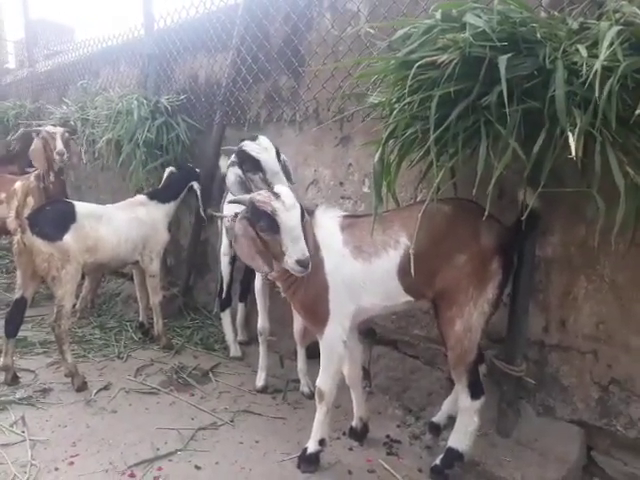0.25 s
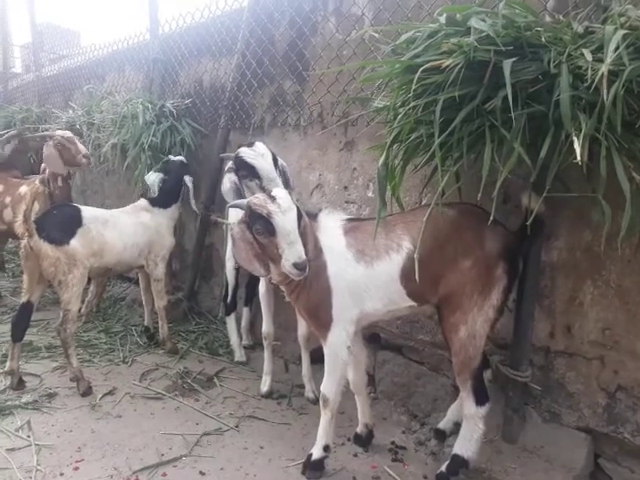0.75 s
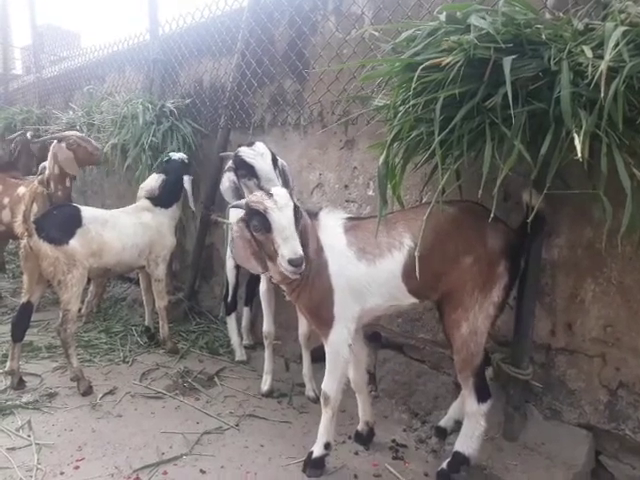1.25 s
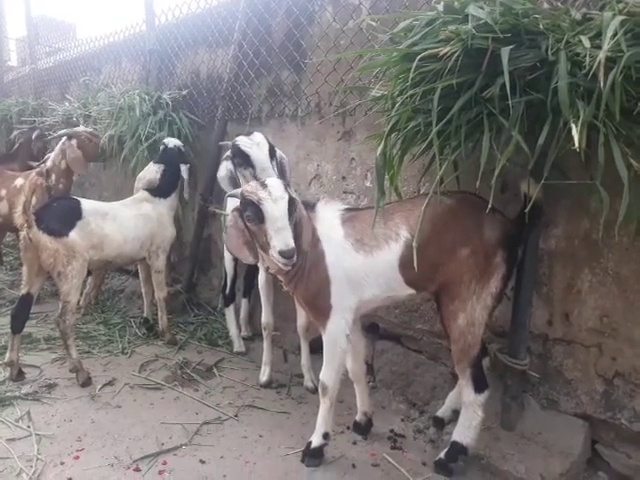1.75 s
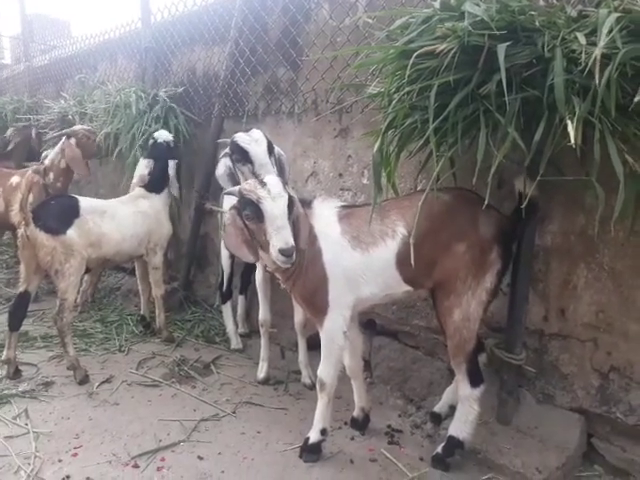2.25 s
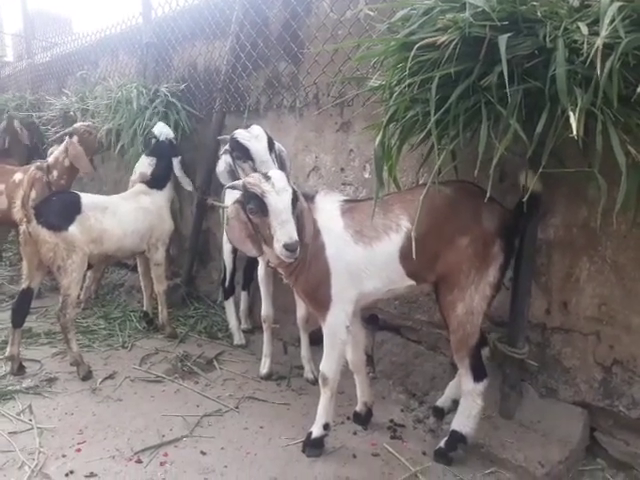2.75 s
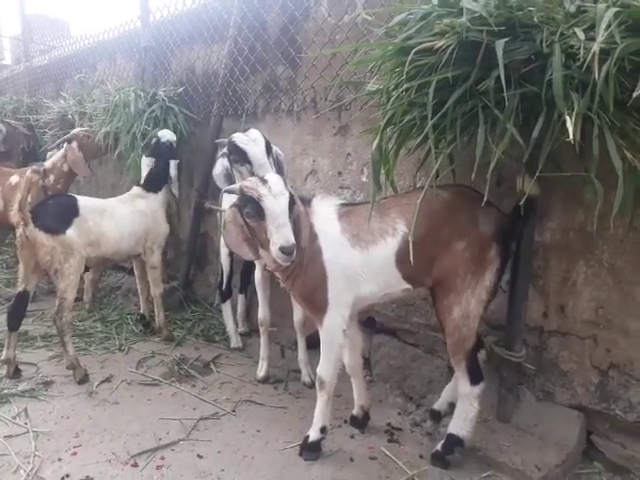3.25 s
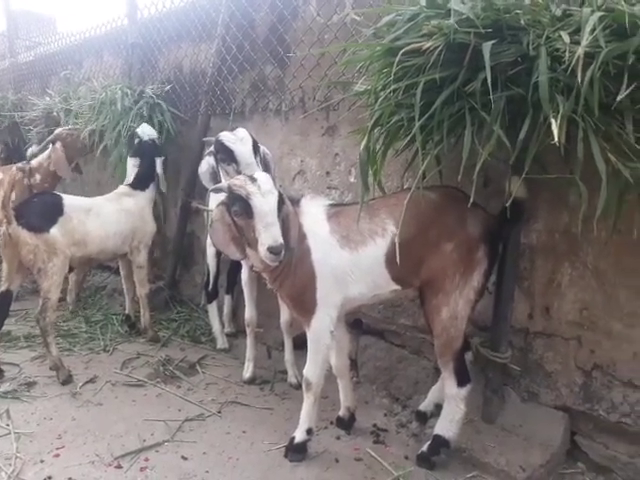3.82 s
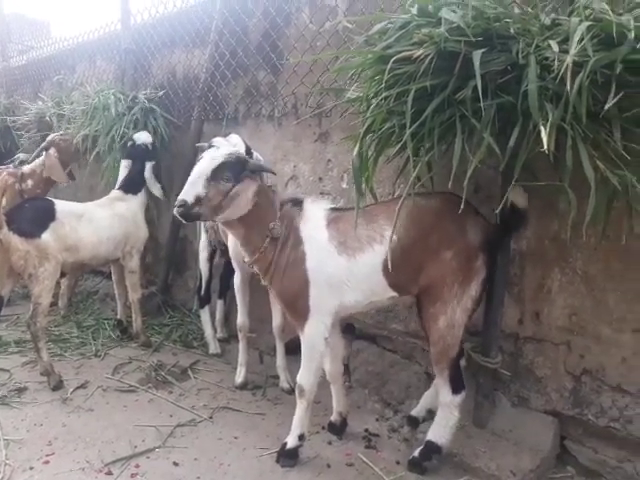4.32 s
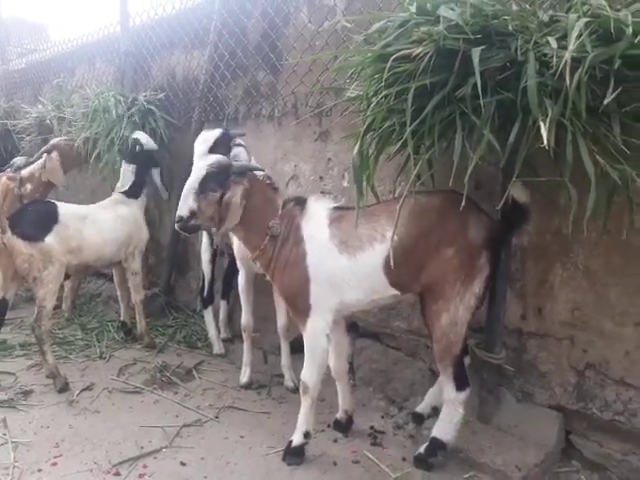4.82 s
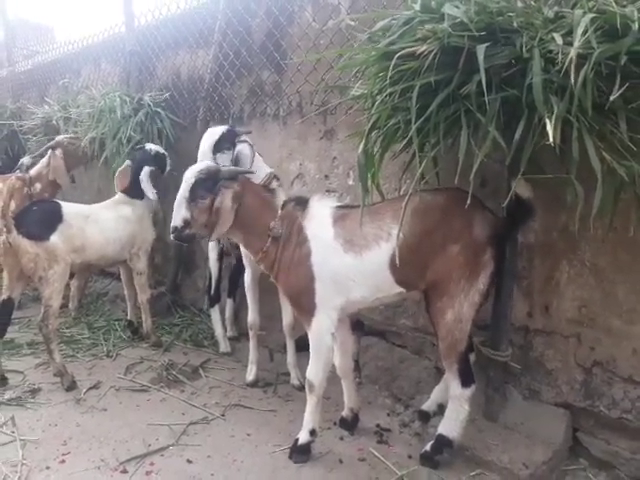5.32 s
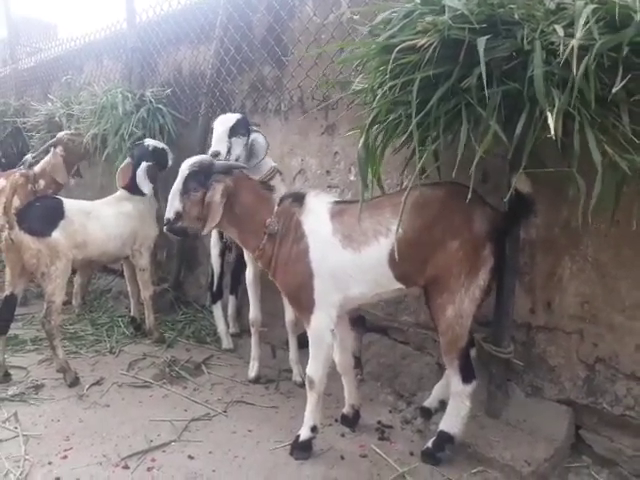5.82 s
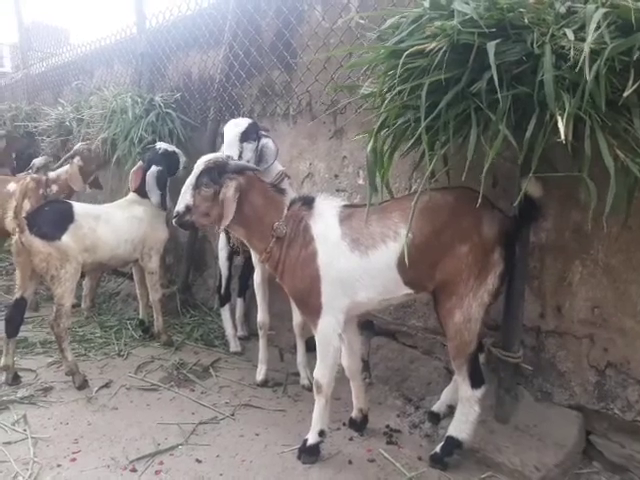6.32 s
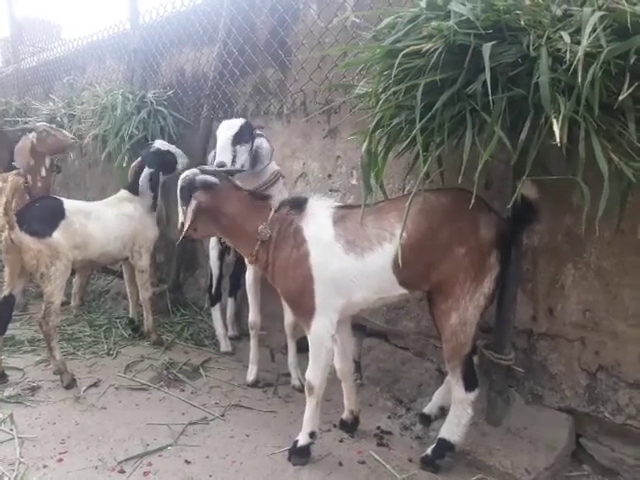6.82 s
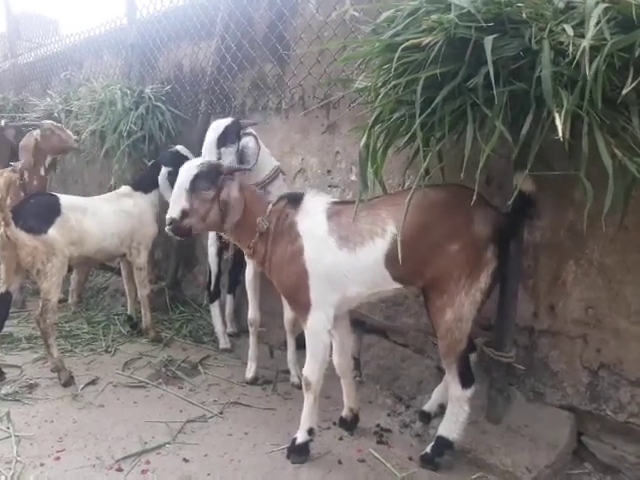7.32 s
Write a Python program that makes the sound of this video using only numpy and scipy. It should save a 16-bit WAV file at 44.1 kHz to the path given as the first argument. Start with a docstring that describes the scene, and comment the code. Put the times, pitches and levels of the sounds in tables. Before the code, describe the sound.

A walled outdoor pen with low rumble and airy hiss, picked up by a simple nearby microphone. From 0 to 0.8 s a young goat bleats at some distance, thin and trembling, around 300 Hz, with raspy bird chirps at the start and near 0.5 s. From 0.95 to 1.75 s a near goat bleats very loudly, buzzy and nasal, throbbing about ten times a second as its mouth opens. The background then sinks, almost hushed from 1.9 to 2.9 s, with faint rustles and tiny ticks. From 3 to 5.4 s grass swishes in short grainy swells, stalks snap crisply, notably at 3.5 and 4.7 s, and a bird chirps at 5.4 s. Light taps and snaps continue to 6.5 s. Heavy, low, rattling knocks strike at 6.65, 7.1 and 7.45 s, while a rougher, quieter bleat runs from 6.95 s to the end, strongest around 7.35 s, as the hiss rises.

```python
"""A walled pen outdoors with young goats: one bleats further off, then one bleats loudly and again near the
end. In between, grass rustles in grainy swells of noise, stalks snap in short bursts, and small birds chirp.
Low rumble and hiss lie under it all; after the loud bleat the background sinks into a hush of about a second.
Three heavy knocks near the end ring low and rattle. A bleat is a buzz of throat pulses shaped by the mouth."""
import sys
import numpy as np
from scipy import signal
from scipy.fft import rfft, irfft, next_fast_len
from scipy.io import wavfile
from scipy.ndimage import uniform_filter1d, minimum_filter1d

SR = 44100
rng = np.random.default_rng(int(sys.argv[2]) if len(sys.argv) > 2 else 0)


def persist_wave(psi):
    """Save psi, clipped to +-1, as 16-bit WAV."""
    counts = np.round(np.clip(psi, -1, 1) * 32767).astype(np.int16)
    wavfile.write(sys.argv[1], SR, np.atleast_2d(counts).T)


N = 333341
TIME = np.arange(N) / SR

# Levels of the background noise, which sinks for about a second after the loud bleat and then returns:
# t/s, rumble level/dB, hiss level/dB, fizz level/dB
BACKGROUND_LEVELS = [(0, -41, -36.5, -73), (.85, -41, -40, -55), (1.3, -41, -35, -69),
                     (1.899, -54.5, -49.5, -80), (2.298, -57.5, -56, -65), (2.7, -58.5, -60, -64.5),
                     (2.95, -48, -48, -63), (3.3, -43.5, -40.5, -54), (4.0, -43, -42, -56),
                     (4.4, -43, -45, -50), (4.65, -42.5, -38.5, -38.5), (5.05, -44, -39.5, -35.5),
                     (5.6, -42.5, -35.5, -34), (6.4, -43.5, -38.5, -35), (7.0, -41, -34.5, -39.5),
                     (7.56, -42, -27, -42)]
# Colour of the rumble, hiss and fizz: f/Hz, relative level/dB
RUMBLE_COLOUR = [(15, -63.5), (25, -6), (76, -14.5), (97, -5), (123, 0.5), (252, -10), (331, -9),
                 (452, -13), (498, -12), (654, -14), (707, -12.5), (795, -14), (2060, -23), (2600, -18.5),
                 (3380, -16.5), (5720, -120)]
HISS_COLOUR = [(1000, -24.5), (2400, -12.5), (3200, -5), (3900, 3), (5000, -1.5), (6200, -7), (7900, -1),
               (8700, -10), (9500, -17), (16000, -19)]
FIZZ_COLOUR = [(700, -11), (1300, -2.5), (2200, -19.5), (6000, 1.5), (8000, 12.5), (9500, -5), (12500, -1),
               (15200, 1.5), (16000, -18)]
# Faint thin tones in the yard: t/s, length/s, level/dB, f/Hz
YARD_TONES = [(0, 0.39, -42.5, 452), (0, .2, -49, 690), (1.8, 0.18, -60.5, 1370), (3.38, 0.39, -49.5, 3190),
              (4.01, 0.27, -47.5, 3180), (4.862, 0.45, -59, 1325)]
# How long the pen's echoes take to fade by 60 dB: f/Hz, fade time/s
PEN_FADE = [(200, 0.42), (1500, 0.21), (4000, 0.38), (8000, 0.17), (15000, 0.074)]
# First echoes off the wall and the floor: delay/s, level/dB
FIRST_ECHOES = [(.0047, -17), (.0083, -19.5)]
# Bird chirps and squeaks: t/s, length/s, level/dB, start f/Hz, middle f/Hz, end f/Hz, rasp/0-1
BIRD_CHIRPS = [(0.065, 0.068, -31.5, 3700, 3820, 3730, 0.62), (0.479, 0.083, -23.5, 4440, 4303, 3660, 0.62),
               (2.642, 0.031, -50, 4800, 5280, 3500, .05), (4.054, 0.031, -38, 4770, 5210, 3500, 0.1),
               (5.112, 0.034, -42, 3200, 3330, 3340, .3), (5.416, .16, -24.5, 3610, 4174, 3654, 0.83),
               (5.916, 0.042, -32, 1260, 1356, 2210, 0.23)]
# Snapping stalks and hoof taps, and one short bird chirp at 6.398 s: t/s, level/dB, centre f/Hz, width/octaves,
# decay/s
STALK_SNAPS = [(2.749, -44, 7950, 0.13, 0.0044), (2.784, -42, 7500, 0.37, 0.0059),
               (2.887, -41.5, 7000, 0.093, 0.0092), (3.125, -34, 13000, 0.44, .035),
               (3.385, -31, 6900, 0.7, 0.0019), (3.487, -22.5, 7800, 0.17, 0.0053),
               (4.177, -34, 7500, 0.19, .003), (4.27, -36, 7450, 0.17, .003),
               (4.697, -20.5, 4530, 1, 0.0045), (4.721, -24, 4500, 0.99, .003),
               (4.74, -21.5, 4200, 0.36, 0.0043), (4.743, -35.5, 1260, 0.53, 0.022),
               (5.384, -37.5, 1300, 0.38, 0.017), (5.475, -41, 1300, .3, .02),
               (5.928, -25, 4430, 0.89, 0.04), (6.078, -24, 1440, 1, 0.0057),
               (6.398, -27, 5540, .15, 0.0046), (6.464, -30, 1900, 1, 0.0057)]
# Swishes of grass: t/s, level/dB, rise/s, decay/s, treble tilt/(dB per octave)
GRASS_SWISHES = [(1.841, -37, 0.037, 0.037, -7.5), (1.99, -37.5, 0.046, 0.047, -10),
                 (2.14, -37.5, 0.018, 0.05, -8.5), (2.954, -31, 0.026, 0.057, -5.5),
                 (3.135, -25, 0.037, .055, -8.5), (3.705, -23.5, 0.026, 0.058, -4.5),
                 (3.845, -24, 0.038, 0.053, -4), (4.8, -25, 0.039, 0.047, -5),
                 (5.33, -26, 0.039, 0.063, -5.5)]
# Colour of the sliding grass: f/Hz, relative level/dB
GRASS_COLOUR = [(1060, -48), (1800, -30.5), (2750, -22), (3120, -12), (4090, 0), (5400, -3.5), (6070, 0),
                (6590, -1.5), (7140, 5), (7470, 4.5), (9790, -19.5), (12700, -25), (15500, -39)]
# Knocks, heavy and faint: t/s, level/dB, treble tilt/(dB per octave)
KNOCK_EVENTS = [(.004, -35.5, -6), (1.925, -43.5, 1.5), (1.975, -48.5, -1), (6.643, -5.5, 0.5),
                (7.088, -7, -1), (7.452, -8.5, -2.5)]
# Low ringing modes of a knock: f/Hz, relative level/dB, time to fade 60 dB/s (capped when used)
KNOCK_LOW_MODES = [(66.5, -10, 0.5), (133.3, -0.5, 0.51), (203, -1, 0.5), (301.5, 0, 0.35),
                   (352, 7.5, 0.19), (445, -10, 0.78), (670, -24, 0.37), (735, -16, 0.1)]
# Colour of the rattling body of a knock: f/Hz, relative level/dB
KNOCK_BODY_COLOUR = [(21, -43), (35, -21), (151, 2), (333, 2.5), (568, -6), (700, -5.5), (883, -13),
                     (1470, -15.5), (1610, -18), (2450, -26), (3720, -25.5), (6060, -36.5), (8010, -28),
                     (9000, -40), (11700, -52), (19800, -120)]
# How long that body takes to fade by 60 dB: f/Hz, fade time/s
KNOCK_BODY_FADE = [(60, 0.38), (200, 0.41), (500, 0.39), (1500, 0.45), (6000, 0.55)]

# Throbs of each bleat, one row a throb: t/s, level/dB, length/s, pitch f/Hz, roughness/0-1,
# mouth (place along the bleat's list of mouth shapes, from 0), level in the lull after it/dB
FAR_THROBS = [(.01, -29.5, 0.016, 289.6, 0.71, 0, -73), (.1, -52, 0.06, 285.7, 0.46, 0, -59),
              (.187, -33, 0.032, 298.8, 0.38, 0, -48), (.28, -26.5, 0.035, 308.4, 0.61, 0, -44),
              (.378, -25.5, 0.043, 302.4, 0.48, 0, -36), (.468, -25.5, 0.048, 302.4, 0.24, 0, -48),
              (.56, -27.5, 0.027, 298, 0.52, 0, -35), (.655, -31, 0.044, 291, 0.33, 0, -43),
              (.75, -41, 0.047, 290, 0.34, 0, -43)]
LOUD_THROBS = [(.93, -29, 0.029, 275.2, 0.3, 0, -39), (1.02, -10.5, 0.035, 277.4, 0.66, 0.41, -22.5),
               (1.1, -11.5, 0.024, 300.1, 0.63, 0.46, -21), (1.128, -3, 0.016, 316.7, 0.4, 0.53, -30),
               (1.197, 1.5, 0.049, 311, 0.63, 0.71, -47), (1.28, -1.5, 0.046, 301.4, 0.24, 0.87, -13),
               (1.38, 3.5, 0.04, 313.1, 0.57, 1.66, -17.5), (1.465, 2.5, 0.055, 322, 0.54, 1.93, -15),
               (1.567, -1, 0.053, 332, 0.5, 1.87, -16), (1.666, -4.5, 0.042, 312.8, 0.58, 1.8, -24),
               (1.725, -20.5, 0.041, 310, 0.1, 1.78, -40), (1.77, -44.5, .025, 279, 0.1, 1.1, -50)]
LAST_THROBS = [(6.95, -27, 0.036, 272.8, 0.67, 0.41, -38), (7.053, -20, 0.038, 292.7, 0.53, 0.17, -38),
               (7.155, -18, 0.038, 305.8, 0.43, 0.35, -40), (7.245, -18.5, 0.035, 314.6, 0.52, 0.2, -32),
               (7.339, -7.5, 0.037, 319.2, 0.59, 2.4, -25.5), (7.437, -12.5, 0.041, 303, 0.14, 1.76, -46),
               (7.538, -21.5, 0.029, 295, 0.31, 0.35, -39)]
# Throat and mouth resonances for each mouth shape: f/Hz, width/Hz, relative level/dB
MOUTH_TURNED_AWAY = [(917, 140, -13.5), (2020, 200, -12), (3300, 340, -1.5), (3950, 480, -3.5),
                     (4426, 170, 5), (5250, 600, -5.5), (6670, 1040, -7.5), (7900, 410, -6.5)]
MOUTH_PARTED = [(299, 280, -22.5), (1193, 230, -9.5), (2190, 180, -10), (3260, 890, -12.5),
                (3640, 350, 0.5), (4550, 560, -8), (5460, 280, -9), (8160, 440, -15)]
MOUTH_OPEN = [(395, 280, -14.5), (1432, 237, -10), (2152, 264, -2.5), (3282, 310, 5.5), (3700, 400, -25.5),
              (4125, 296, 0.5), (5050, 700, -13.5), (8450, 580, -25.5)]
MOUTH_WIDE = [(547, 220, -19.5), (1160, 256, -18), (2176, 130, -1), (3130, 455, 1), (3814, 360, 11),
              (4750, 450, -0.5), (5600, 230, -4.5), (6680, 200, -5), (7600, 1800, -18.5)]
MOUTH_SLACK = [(453, 300, -11), (1186, 280, 0), (2175, 285, 3.5), (3210, 510, 4), (4200, 270, 1),
               (5100, 520, -7), (8270, 1030, -7.5), (11000, 640, -16.5), (15200, 500, -16)]  # a relaxed mouth
MOUTH_TENSE = [(300, 240, -28.5), (1280, 410, -26), (2160, 220, -18.5), (2920, 290, -18), (3960, 270, -2.5),
               (4920, 450, -8.5), (6530, 210, -11), (8060, 1160, -16.5)]
# Voice left between the resonances: f/Hz, relative level/dB
BUZZ_FLOOR = [(200, -50), (800, -50), (6000, -30.5), (9000, -35), (9700, -46), (10400, -31), (11500, -31.5),
              (12200, -45), (13000, -31.5), (14100, -50), (15100, -31), (15800, -51.5)]
# Colour of the low flutter of air in the throat: f/Hz, relative level/dB
FLUTTER_COLOUR = [(60, -32), (170, -14), (300, 0), (480, -3), (700, -10.5), (1000, -11), (3000, -59)]


def amp(db):
    """Turns decibels into a gain."""
    return 10 ** (np.asarray(db) / 20)


def unit(x):
    """Scales a sound to an average (rms) strength of 1."""
    return x / np.sqrt(np.mean(x ** 2) + 1e-20)


def read(points, hz):
    """Reads a curve between its points, on a log-frequency axis."""
    f, value = np.transpose(points)
    return np.interp(np.log(hz + 1), np.log(f + 1), value)


def add(mix, s, sound):
    """Mixes a sound in at time s, in seconds."""
    part = mix[max(round(s * SR), 0):][:len(sound)]
    part += sound[:len(part)]


def noise(size, shape):
    """Makes noise of rms 1 whose spectrum in dB is shape(Hz)."""
    hz = np.fft.rfftfreq(size, 1 / SR) + 1
    spectrum = rfft(rng.standard_normal(size)) * amp(shape(hz))
    return unit(irfft(spectrum, size))


def wander(size, hz):
    """Makes a smooth random drift of rms 1, moving about hz times a second."""
    return noise(size, lambda f: -10 * np.log10(1 + (f / hz) ** 4))


def die_away(x, t60):
    """Lets each band of x fade at its own speed."""
    hz, t, bands = signal.stft(x, SR, nperseg=256)
    fade = amp(-60 * t / read(t60, hz)[:, None])
    return signal.istft(bands * fade, SR, nperseg=256)[1][:len(x)]


def background(flutter_db=1.57, flutter_hz=17):
    """Outdoor rumble, hiss and fizz: coloured noises that follow set levels and flutter a little."""
    s, *levels = np.transpose(BACKGROUND_LEVELS)
    size = next_fast_len(N)
    out = np.zeros(N)
    for db, colour in zip(levels, [RUMBLE_COLOUR, HISS_COLOUR, FIZZ_COLOUR]):
        level_db = np.interp(TIME, s, db) + flutter_db * wander(size, flutter_hz)[:N]
        out += amp(level_db) * noise(size, lambda f: read(colour, f))[:N]
    return out


def tones():
    """Thin steady-pitched tones (sine waves) that swell quickly and fade slowly."""
    out = np.zeros(N)
    for s, length, db, hz in YARD_TONES:
        t = np.arange(int(length * SR)) / SR
        swell = np.sin(np.pi * np.sqrt(t / length))
        add(out, s, amp(db) * np.sqrt(2) * swell * np.sin(2 * np.pi * hz * t))
    return out


def pen(x, size=22000, echoes_per_s=2500):
    """Scattered echoes from the walls and floor, each band fading at its own speed."""
    signs = rng.choice([-1., 1.], size)
    chosen = rng.random(size) < echoes_per_s / SR
    late = np.arange(size) > .004 * SR  # none in the first 4 ms
    tail = die_away(signs * chosen * late, PEN_FADE)
    return signal.fftconvolve(x, tail / np.linalg.norm(tail))[:N]


def bounced(x):
    """The direct sound and its first echoes, which comb the harmonics as the pitch moves."""
    out = x.copy()
    for delay, db in FIRST_ECHOES:
        out += amp(db) * np.pad(x, (round(delay * SR), 0))[:N]
    return out


def chirps(rasp_hz=420, flutter_hz=590):
    """Bird whistles with an arched pitch, roughened by a fast random flutter of that pitch."""
    out = np.zeros(N)
    for s, length, db, start, middle, end, rasp in BIRD_CHIRPS:
        u = np.linspace(0, 1, int(length * SR))
        arch = np.polyval(np.polyfit([0, .5, 1], [start, middle, end], 2), u)
        hz = arch + rasp_hz * rasp * wander(len(u), flutter_hz)
        whistle = np.sqrt(2) * np.sin(2 * np.pi * np.cumsum(hz) / SR)
        add(out, s, amp(db) * np.sin(np.pi * u) ** 0.85 * whistle)
    return out


def snaps():
    """Breaking stalks, shifting hooves and one short chirp: short bursts of noise around one pitch."""
    out, t = np.zeros(N), np.arange(SR // 8) / SR
    for s, db, hz, octaves, decay in STALK_SNAPS:
        burst = noise(len(t), lambda f: -20 * np.log10(1 + (np.log2(f / hz) / octaves) ** 2))
        add(out, s, amp(db) * np.exp(-t / decay) * burst)
    return out


def rustles(grain_db=2, grain_hz=460):
    """Blades of grass slide over each other: a grainy hiss that swells and dies."""
    out, t = np.zeros(N), np.arange(-SR // 8, SR // 2) / SR  # t = 0 at the loudest moment
    for s, db, rise, decay, tilt_db in GRASS_SWISHES:
        swish = noise(len(t), lambda f: read(GRASS_COLOUR, f)
                      + tilt_db * np.log2(np.clip(f, 3000, 9000) / 5000))
        rising = np.exp(-(t / rise) ** 2)
        dying = np.exp(1 - np.sqrt(1 + (t / decay * 1.33) ** 2))
        grainy = unit(swish * amp(grain_db * wander(len(t), grain_hz)))
        add(out, s + t[0], amp(db) * np.where(t < 0, rising, dying) * grainy)
    return out


def knocks(modes_db=-4, body_db=0, rise=0.0023, hold=0.012):
    """A blow sets off a few low modes and a dense, rattling body; rise and hold are in seconds."""
    out, t = np.zeros(N), np.arange(SR // 2) / SR
    onset = (1 - np.exp(-t / rise)) * (0.65 + 0.39 * np.exp(-(t / hold) ** 2))
    for s, db, tilt_db in KNOCK_EVENTS:
        ring = np.zeros(len(t))
        for hz, level, t60 in KNOCK_LOW_MODES:
            fade = amp(level - 60 * t / min(t60, .45))
            ring += fade * np.sin(2 * np.pi * (hz * t + rng.random()))
        rattle = noise(len(t), lambda f: read(KNOCK_BODY_COLOUR, f)
                       + tilt_db * np.log2(np.maximum(f, 300) / 300))
        body = die_away(rattle, KNOCK_BODY_FADE)
        # balance the two parts by their strength in the first 1/30 s
        blow = amp(modes_db) * ring / np.std(ring[:SR // 30])
        blow += amp(body_db) * body / np.std(body[:SR // 30])
        add(out, s, amp(db) * blow * onset)
    return out


def throat(resonances, size=2048):
    """The ring of the throat and mouth after one closure of the vocal folds."""
    hz = np.fft.rfftfreq(size, 1 / SR)
    power = amp(read(BUZZ_FLOOR, hz)) ** 2
    for f, width, db in resonances:
        power = power + amp(db) ** 2 / (1 + ((hz - f) / width) ** 2) ** 4
    bass_cut = (hz + 1) ** 4 / (hz ** 4 + 200 ** 4)  # thins the voice below 200 Hz
    log_gain = np.log(power * bass_cut) / 2
    # minimum phase: the ring starts at the closure, never before it
    analytic = signal.hilbert(np.r_[log_gain, log_gain[-2:0:-1]])
    return np.fft.ifft(np.exp(analytic.conj())).real[:size // 2]


def bleat(throbs, mouths, arch, quaver, edge, jitter, rasp, limp,
          shimmer_db=5, quaver_hz=21.5, flutter_db=-20):
    """Fold pulses swell in throbs about ten times a second; the pitch moves as the mouth changes shape."""
    s, db, length, pitch, rough, mouth, lull_db = np.transpose(throbs)
    t = np.arange(max(s[0] - .06, 0), s[-1] + 0.052, 1 / SR)
    size = len(t)
    rough = np.interp(t, s, np.clip(rough, 0, 1))
    mouth = np.interp(t, s, np.clip(mouth, 0, len(mouths) - 1))

    # each throb is at half height half its length away from its peak; lulls fill the gaps
    swells = .5 ** abs(2 * (t - s[:, None]) / length[:, None]) ** edge
    lulls = amp(np.interp(t, s + length, lull_db)) * (1 - np.minimum(swells.sum(0), 1))
    level = amp(db) @ swells + lulls

    # the pitch arches over each throb and quavers at about twice the rate of the throbs
    cycle = 2 * np.pi * np.interp(t, s, np.arange(len(s)))
    bend = arch * (np.cos(cycle) - 1) + quaver * np.cos(2 * np.pi * quaver_hz * (t - s[0]))
    hz = np.interp(t, s, pitch) * (1 + bend)

    # the folds rattle when pressed hardest and run cleaner in the lulls
    rough = rough * (.15 + .85 * swells.max(0))
    turns = np.cumsum(hz * (1 + jitter * rough * wander(size, 180))) / SR
    at = np.interp(np.arange(1, int(turns[-1])), turns, np.arange(size))  # closures, in samples
    rattle = rough[at.astype(int)]
    # every other closure comes a little late, which puts half lines between the harmonics
    at = at + limp * rattle * np.gradient(at) * (np.arange(len(at)) % 2)

    # place each pulse between samples, with a random strength
    near = at.astype(int)[:, None] + np.arange(-8, 9)
    strength = amp(shimmer_db * rattle * rng.standard_normal(len(at)))
    spike = np.sinc(near - at[:, None]) * np.hanning(near.shape[1])
    pulses = np.zeros(size)
    np.add.at(pulses, np.clip(near, 0, size - 1), strength[:, None] * spike)

    # breath noise puffs out once in every cycle of the folds
    puffs = (.2 + np.exp(-(turns % 1) / .25)) * rng.standard_normal(size)
    drive = unit(pulses) + rasp * rough * unit(puffs)

    # blend neighbouring mouth shapes
    voice = np.zeros(size)
    for k, shape in enumerate(mouths):
        share = np.maximum(1 - abs(mouth - k), 0)
        voice += share * unit(signal.fftconvolve(drive, throat(shape))[:size])
    # the low flutter is lost as the mouth place nears 1.9
    flutter = noise(size, lambda f: read(FLUTTER_COLOUR, f))
    voice += amp(flutter_db) * rough * np.clip(1.9 - mouth, 0, 1) * flutter

    out = np.zeros(N)
    add(out, t[0], voice * level * signal.windows.tukey(size, .04))
    return out


def scene(near_wet_db=-21, far_wet_db=-10, small_wet_db=-10):
    """Near bleats are almost dry, further sounds carry more of the pen; both channels are alike."""
    small = rustles() + snaps()
    far_bleat = bleat(FAR_THROBS, [MOUTH_TURNED_AWAY],
                      arch=.045, quaver=0, edge=2, jitter=.02, rasp=.35, limp=.01)
    loud = bleat(LOUD_THROBS, [MOUTH_PARTED, MOUTH_OPEN, MOUTH_WIDE],
                 arch=0, quaver=.03, edge=4, jitter=.018, rasp=.28, limp=.036)
    last = bleat(LAST_THROBS, [MOUTH_SLACK, MOUTH_WIDE, MOUTH_TENSE],
                 arch=.016, quaver=.008, edge=2.6, jitter=.025, rasp=.55, limp=.03)
    far = far_bleat + chirps()
    near = bounced(loud + last)
    echoes = pen(amp(near_wet_db) * near + amp(far_wet_db) * far + amp(small_wet_db) * small)
    mix = background() + tones() + small + knocks() + far + near + echoes
    return np.tile(mix, (2, 1))


def record(dry, low_cut_hz=47, edge_hz=15800, window=260):
    """Drops the deepest bass, turns down peaks above full scale with a fast limiter, then cuts the top."""
    bass_cut = signal.butter(4, low_cut_hz, "high", fs=SR, output="sos")
    thin = signal.sosfilt(bass_cut, dry)
    headroom = 1 / np.maximum(abs(thin).max(0), 1)
    # window is in samples, about 6 ms
    limited = thin * uniform_filter1d(minimum_filter1d(headroom, size=window), size=window)
    treble_cut = signal.firwin(511, edge_hz, window=("kaiser", 9), fs=SR)
    return signal.oaconvolve(limited, treble_cut[None], "same")


dry = scene()
out = record(dry)
persist_wave(out)
```